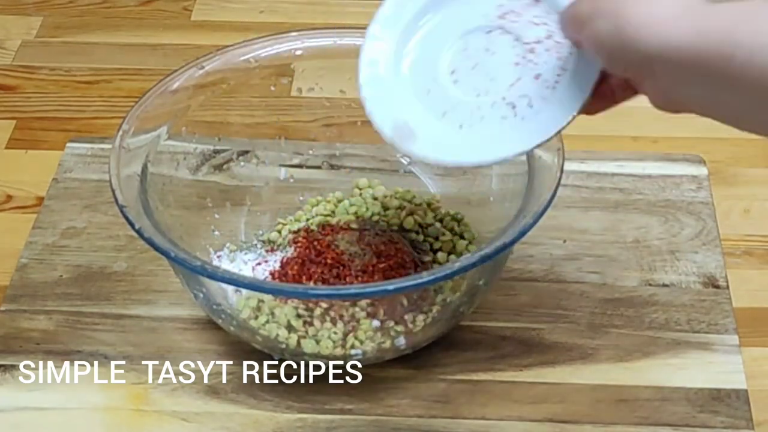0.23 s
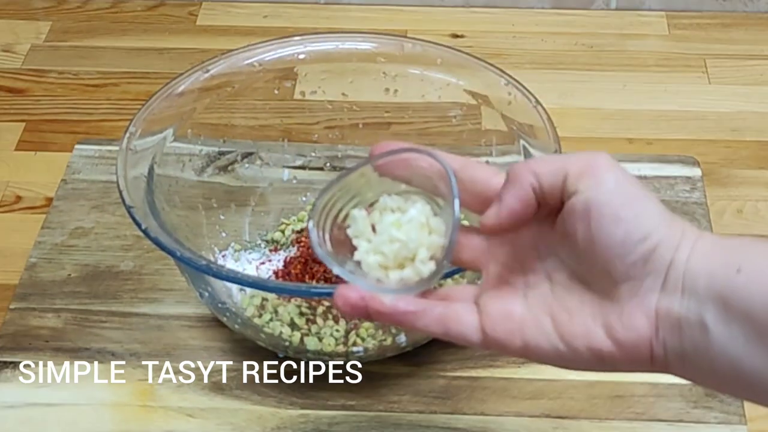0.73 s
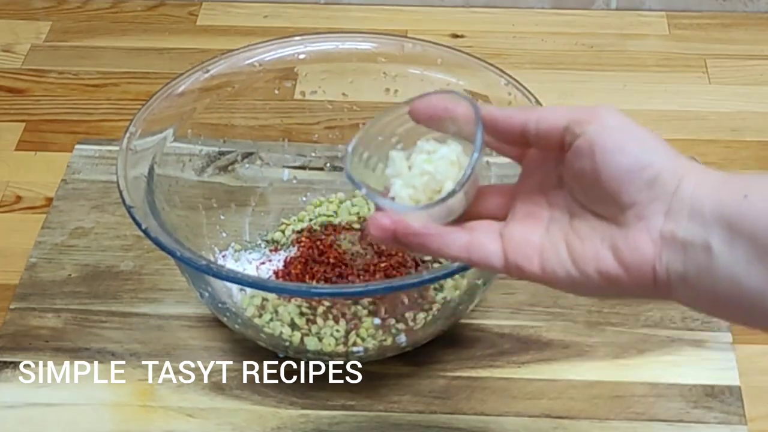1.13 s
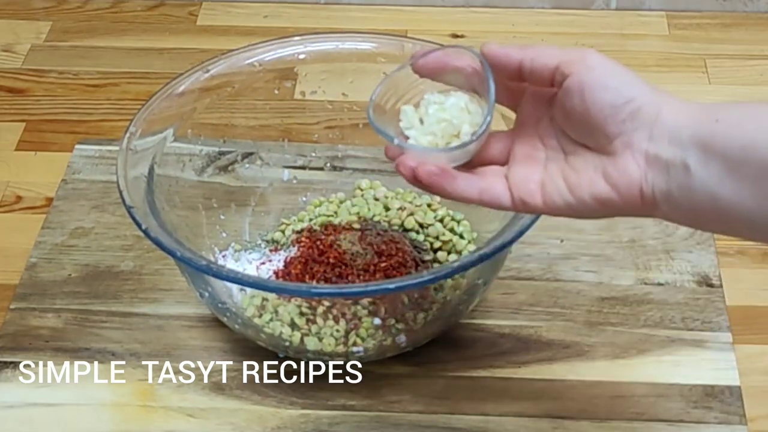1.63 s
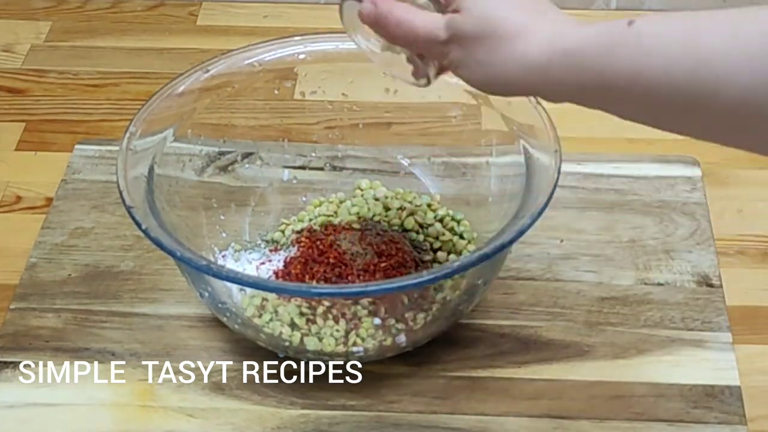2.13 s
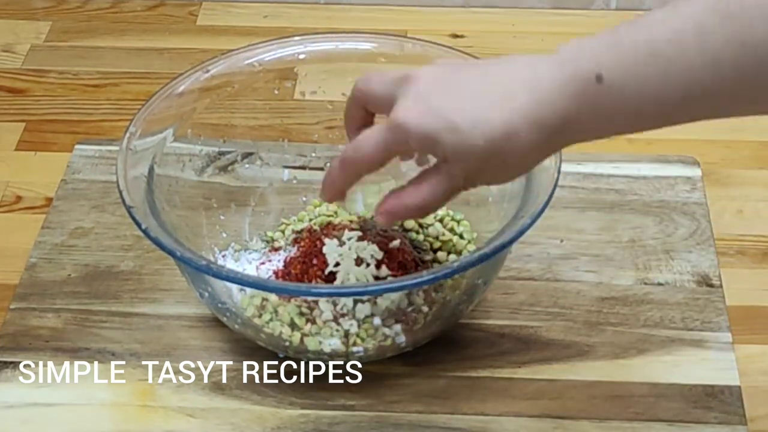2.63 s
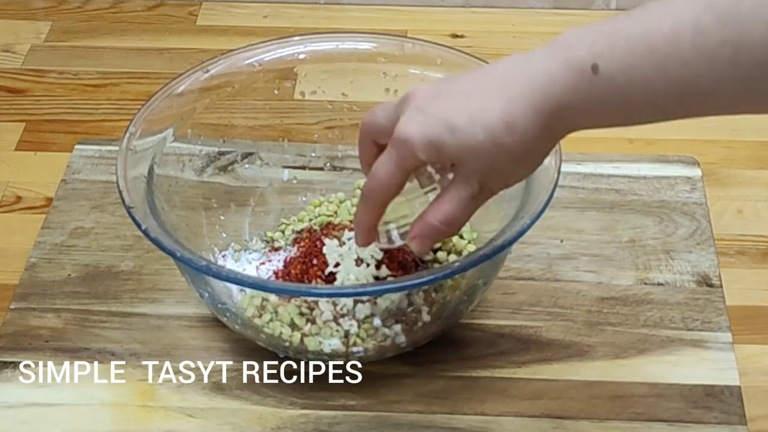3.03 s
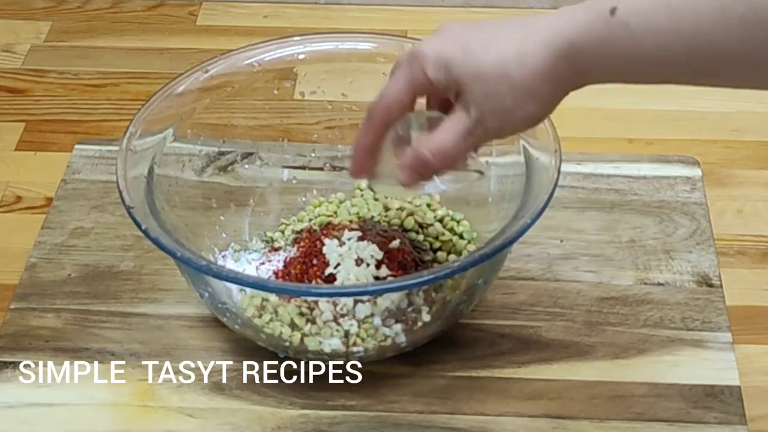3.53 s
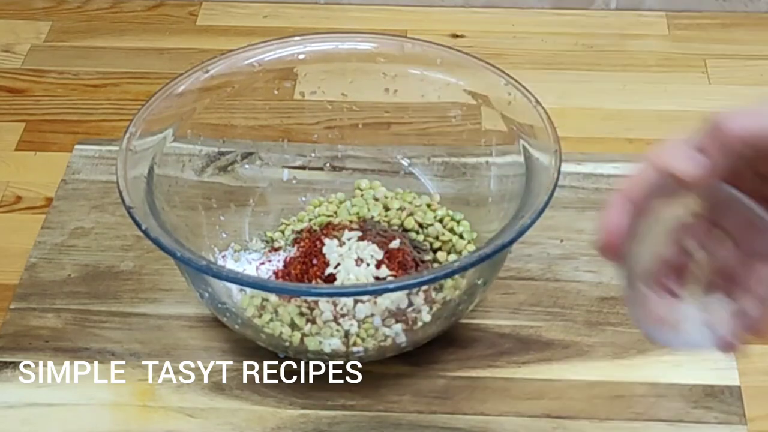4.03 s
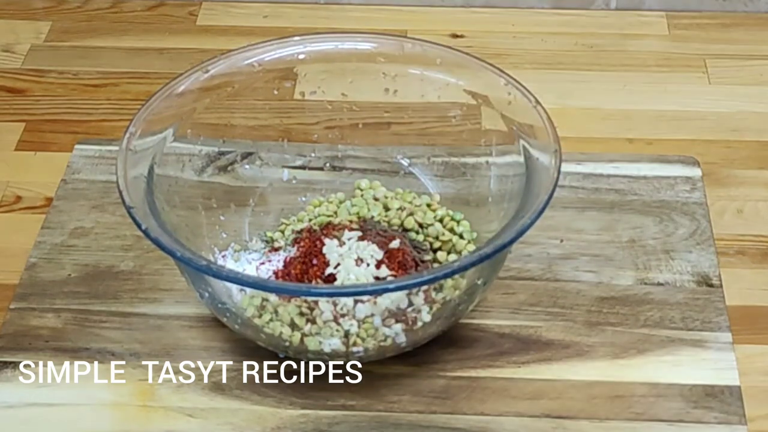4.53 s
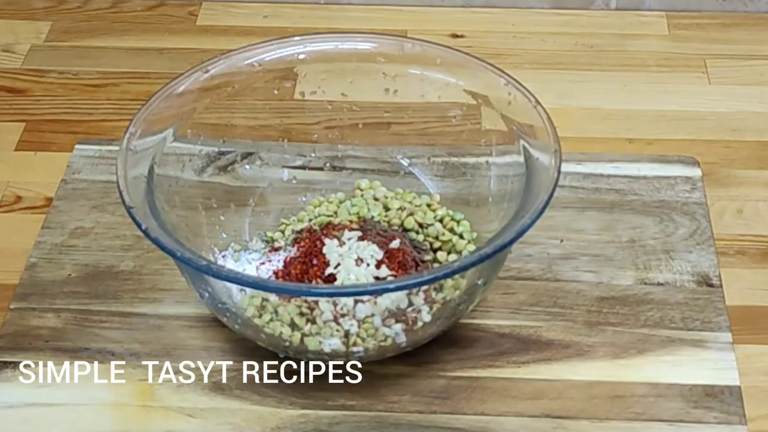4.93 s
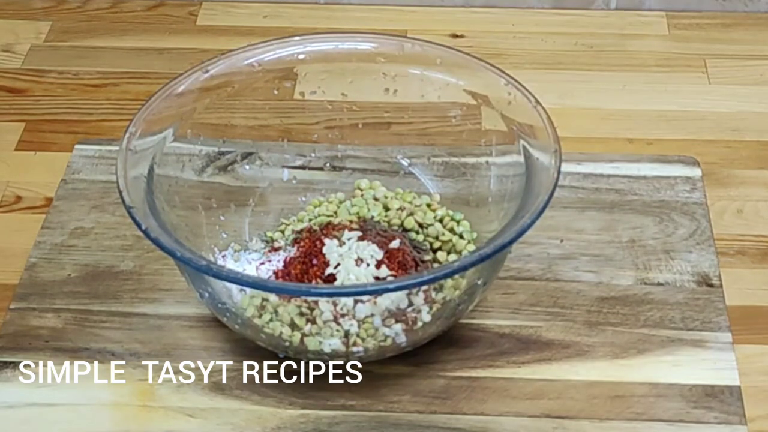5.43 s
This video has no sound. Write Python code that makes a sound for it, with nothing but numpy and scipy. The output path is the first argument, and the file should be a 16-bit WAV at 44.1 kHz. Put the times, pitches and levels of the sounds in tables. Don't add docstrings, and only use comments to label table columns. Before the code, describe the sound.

Small dishes tap a big glass bowl with clear shimmering rings, followed by soft and then hard wooden thumps over faint fridge hum.

```python
import sys
import numpy as np
from scipy import signal
from scipy.fft import rfft, irfft
from scipy.io import wavfile
from scipy.ndimage import uniform_filter1d

SR = 44100
rng = np.random.default_rng(int(sys.argv[2]) if len(sys.argv) > 2 else 0)


def volts_from_db(level):
    exponent = np.asarray(level, float) / 20
    return 10 ** exponent


def inscribe(sig):
    pcm = np.round(np.clip(np.atleast_2d(sig).T, -1, 1) * 32767)
    wavfile.write(sys.argv[1], SR, pcm.astype(np.int16))


N = 250047


def rms_one(x):
    return x / np.sqrt(np.mean(x ** 2) + 1e-20)


def at_hz(points, hz):
    table_hz, value = np.array(points).T[:2]
    return np.interp(np.log(np.maximum(hz, 1)), np.log(table_hz), value)


def filtered(x, order, edge_hz, kind="low"):
    return signal.sosfilt(signal.butter(order, edge_hz, kind, fs=SR, output="sos"), x)


def drift(rate_hz):
    r = np.exp(-80 * np.pi * rate_hz / SR)
    white = rng.standard_normal(N // 40 + 2002)
    slow = signal.lfilter([1], [1, -2 * r, r * r], white)[2000:]
    return np.interp(np.arange(N) / 40, np.arange(len(slow)), rms_one(slow))


# (frequency [Hz], left-right likeness [-1..1])
LIKENESS = [(60, 0.75), (150, 0.94), (380, 0.8), (950, 0.22), (2380, 0.41), (5970, -0.01), (15000, 0.58)]


def stereo_noise(spectrum, size):
    hz = np.fft.rfftfreq(size, 1 / SR)
    alike = np.clip(at_hz(LIKENESS, hz), 0, 1)
    mid, side = rfft(rng.standard_normal((2, size)))
    inside = (hz > spectrum[0][0] / 2) & (hz < spectrum[-1][0] * 2)
    both = np.sqrt(1 + alike) * mid + np.sqrt(1 - alike) * side * [[1], [-1]]
    return rms_one(irfft(both * volts_from_db(at_hz(spectrum, hz)) * inside, size))


def resonate(x, hz, width_hz):
    r = np.exp(-np.pi * width_hz / SR)
    zeros = (1 - r * r) / 2 * np.array([1, 0, -1])
    return signal.lfilter(zeros, [1, -2 * r * np.cos(2 * np.pi * hz / SR), r * r], x)


def ringing(since, hz, t60, lead_turns=0):
    contact_s = .001
    wave = np.sin(2 * np.pi * (hz * since + lead_turns))
    return wave * volts_from_db(-60 * since / t60) * (1 - np.exp(-since / contact_s))


# (frequency [Hz], level [dB])
HISS = [(1760, -25.5), (3000, -3), (3750, 0.5), (6690, -15.5), (11700, -4), (13700, -2), (14600, -10),
        (15000, -22)]
HISS_DB = -81


def hiss():
    return volts_from_db(HISS_DB + 1.2) * stereo_noise(HISS, N)


# (frequency [Hz], density [dB per Hz])
RUMBLE = [(30, -26.5), (60, -22.5), (100, -12.5), (122, -11.5), (138, 2), (160, -9.5), (300, -6.5),
          (420, -10.5), (630, -20.5), (1000, -25.5), (2000, -32), (4000, -49.5)]
RUMBLE_DB = -61


def rumble():
    return volts_from_db(RUMBLE_DB) * stereo_noise(RUMBLE, N)


# (frequency [Hz], level re hum [dB])
HUM_OVERTONES = [(299.6, -19), (495.0, -24.5), (660.0, -30.5), (1344.2, -51.5)]
HUM_HZ, HUM_DB = 199.6, -54.5


def refrigerator_hum():
    t = np.arange(N) / SR
    hum = np.sin(2 * np.pi * HUM_HZ * t + 0.32 * drift(0.83)) * volts_from_db(1.2 * drift(12))
    for hz, level_db in HUM_OVERTONES:
        level = volts_from_db(level_db + 3.0 * drift(14))
        hum = hum + level * np.sin(2 * np.pi * hz * t + 0.27 * drift(2.9))
    return np.sqrt(2) * volts_from_db(HUM_DB + np.c_[[-.8, .8]]) * hum


# (frequency [Hz], level [dB])
RUSTLE = [(400, -12.5), (800, 4.5), (1300, -6.5), (2200, -4.5), (5000, -19)]
# (time [s], level [dB], half length [s])
MOVES = [
    (.6, -76, 0.1),
    (1.15, -76, 0.16),
    (2.6, -86, 0.18),
    (3.3, -72, 0.1),
    (4.2, -79, 0.14),
]
STILL_DB = -86


def rustle():
    t = np.arange(N) / SR
    moving = volts_from_db(STILL_DB) + sum(volts_from_db(db) * np.exp(-((t - s) / half_s) ** 2) for s, db, half_s in MOVES)
    return moving * volts_from_db(1.5 * drift(6.6)) * stereo_noise(RUSTLE, N)


SCENE_CHANGE_S, CHANGE_DIP_S, CHANGE_DIP_DB = .5959, .0066, -14
POWDER_S, POWDER_RISE_S, POWDER_DB, POWDER_HZ = 0.12, .03, -69.5, 9000


def sliding_powder():
    t = np.arange(N) / SR
    grains = resonate(rng.standard_normal((2, N)), POWDER_HZ, 5000)
    flow = np.clip((t - POWDER_S) / POWDER_RISE_S, 0, 1) * (t < SCENE_CHANGE_S)
    return volts_from_db(POWDER_DB) * grains * flow


def background():
    return sliding_powder() + refrigerator_hum() + rumble() + rustle() + hiss()


# (frequency [Hz], t60 [s])
ROOM_T60 = [(100, 0.54), (260, 0.55), (700, 0.42), (1840, 0.35), (4850, 0.3), (12800, 0.08)]
# (delay [s], level over the tail [dB], smear [s])
ECHOES = [(.0095, 6, 0.0056), (.021, 3, 0.0062), (0.034, 10, 0.0017)]


def kitchen():
    t = np.arange(int(.8 * SR)) / SR
    white, tail = stereo_noise([(20, 0), (20000, 0)], len(t)), 0
    edges_hz = 60 * 2 ** np.arange(0, 8.1, .5)
    for low_hz, high_hz in zip(edges_hz, edges_hz[1:]):
        band = filtered(white, 2, [low_hz, high_hz], "band")
        tail = tail + band * volts_from_db(-60 * t / at_hz(ROOM_T60, np.sqrt(low_hz * high_hz)))
    tail = tail * (1 - np.exp(-t / 0.02))
    returns_db = sum(db * np.exp(-((t - delay_s) / smear_s) ** 2) for delay_s, db, smear_s in ECHOES)
    tail = tail * volts_from_db(returns_db)
    return tail / np.sqrt(np.sum(tail ** 2) / 2)


# (time [s], level [dB], centre [Hz], width [Hz])
TICKS = [
    (.6165, -53.5, 3960, 893),
    (0.749, -74, 10100, 5000),
    (.778, -72, 11970, 5000),
    (0.796, -78, 7000, 5970),
    (.888, -83, 8000, 8150),
    (.944, -77, 11100, 5000),
    (2.461, -77, 6020, 7000),
    (3.19, -68, 9900, 7000),
    (1.194, -70, 10400, 7900),
]


def ticks():
    out, t = np.zeros((2, N)), np.arange(400) / SR
    for s, level_db, hz, width_hz in TICKS:
        burst = rng.standard_normal((2, len(t))) * volts_from_db(-60 * t / 0.004)
        click = resonate(resonate(burst, hz, width_hz), hz, width_hz)
        at = round(s * SR)
        out[:, at:at + len(t)] += volts_from_db(level_db + 20.5) * click
    return out


# (frequency [Hz], level [dB], t60 [s])
PANEL = [(132.7, -13, 0.12), (359.4, -6, 0.0976), (625, 6.5, 0.019), (711, -7, 0.06), (930, -14.5, 0.028),
         (1011, 4.5, 0.041), (1350, -10, 0.11), (1960, -29, 0.043)]
# (time [s], level [dB], softness cut-off [Hz], left-right [dB])
BLOWS = [
    (3.21, -46, 256, -2),
    (3.236, -38, 396, -2),
    (3.27, -51.5, 685, 2.5),
    (3.315, -47, 334, 2),
    (3.36, -46.5, 350, 0),
    (3.447, -54.5, 230, -4),
    (5.2848, -20.5, 1285, -1),
    (5.388, -19, 1404, 0.5),
]
# (delay [s], level [dB])
BOUNCES = [
    (0, 0.5),
    (.0055, -4),
    (.034, -4.5),
]
HARD_HZ = 800
THUD_DB, THUD_HZ, THUD_T60_S = 3, 154, .09


def panel_blow(t, soft_hz):
    body = sum(volts_from_db(db + rng.normal(0, 1.5)) * ringing(t, hz, t60) for hz, db, t60 in PANEL)
    body = body + volts_from_db(THUD_DB) * (300 / soft_hz) ** 2 * ringing(t, THUD_HZ, THUD_T60_S)
    rattle = filtered(rng.standard_normal((2, len(t))), 3, 400, "high") * volts_from_db(-60 * t / 0.017)
    body = filtered(body + 7.26 * rattle, 3, soft_hz)
    return body + volts_from_db(-23.5) * (soft_hz / 1300) ** 2 * rattle


def knocks():
    out, t = np.zeros((2, N)), np.arange(int(.25 * SR)) / SR
    for s, level_db, soft_hz, pan_db in BLOWS:
        for delay_s, loss_db in (BOUNCES if soft_hz > HARD_HZ else BOUNCES[:1]):
            blow = volts_from_db(level_db + loss_db + pan_db * np.c_[[.5, -.5]]) * panel_blow(t, soft_hz)
            at = round((s + delay_s) * SR)
            out[:, at:at + len(t)] += blow[:, :N - at]
    return filtered(out, 4, 115, "high")


# (frequency [Hz], twin frequency [Hz])
RIM_HZ = [(511.0, 513.6), (1344.6, 1339.5), (2459.5, 2461.5), (3836.5, 3829.5), (5374.0, 5365.5)]
# (t60 [s], twin t60 [s], twin lead [turns], share sent to the room [dB])
RIM_DECAY = [(0.86, .6, -0.0061, -11), (0.7, .55, 0.2, -18.5), (0.51, 1.1, -.22, -8), (.18, .15, 0, -1.5),
             (.12, 0.1, 0, -2)]
# (lobes [count], level [dB], left-right [dB], twin share left [ratio], right [ratio])
RIM_FACING = [(2, -21, -8.5, 1.4, .5), (3, -5, 8.5, 0.093, 1.1), (4, -7, -2.5, .07, 0.018),
              (5, -9.5, 2, .48, .4), (6, -29, -1.5, .6, .8)]
KNEE_HZ = 2100


def rim_modes(t, force_db, hard_db_per_octave, place_rad):
    out = 0
    swell = 1 - 0.48 * np.exp(-t / 0.029)
    for (hz, twin_hz), decay, facing in zip(RIM_HZ, RIM_DECAY, RIM_FACING):
        t60, twin_t60, turns, room_db = decay
        lobes, db, pan_db, left, right = facing
        share = np.c_[[left, right * np.cos(round(lobes) * place_rad)]]
        pair = ringing(t, hz, t60) + share * ringing(t, twin_hz, twin_t60, turns)
        bright_db = hard_db_per_octave * max(np.log2(hz / KNEE_HZ), 0)
        gain = volts_from_db(db + force_db + bright_db + pan_db * np.c_[[.5, -.5]])
        out = out + gain * np.array([volts_from_db(-1.4) * swell * pair, volts_from_db(room_db) * pair])
    return out


WALL_HZ = [1857, 2589, 3553, 5803, 6137, 6380, 6675, 7060, 7146, 7445, 7862, 8247, 8630, 8870, 9630, 9981,
           10582, 10795, 11495, 12235, 13345, 13710, 14020]
# (t60 [s], level [dB])
WALL = [(0.59, -49.5), (0.099, -34.5), (0.087, -40), (0.43, -54), (0.2, -53), (0.2, -46.5), (0.13, -53),
        (0.15, -53.5), (0.15, -42), (0.12, -51.5), (0.27, -58.5), (0.16, -58.5), (0.084, -47.5),
        (0.35, -47), (0.13, -50.5), (0.19, -55), (0.18, -53), (0.27, -54), (0.23, -54), (0.18, -52),
        (0.18, -54), (0.18, -54.5), (0.17, -62.5)]
WALL_SCATTER_DB = 5.5


def wall_modes(t, wall_db):
    wall = 0
    for k, (hz, (t60, db)) in enumerate(zip(WALL_HZ, WALL)):
        t60 = min(t60, .27)
        share, sign = rng.uniform(-2.2, 1.0, (2, 1)), np.c_[[1, (-1) ** (k // 2)]]
        gain = volts_from_db(wall_db + db + WALL_SCATTER_DB * rng.standard_normal())
        wall = wall + gain * (sign * ringing(t, hz, t60) + share * ringing(t, hz * 1.002, t60))
    return wall


def contact_crack(t, crack_db, low_hz, high_hz, edge_db):
    burst = rng.standard_normal((2, len(t))) * np.minimum(t / .0006, 1) * volts_from_db(-60 * t / .018)
    crack = filtered(filtered(burst, 8, high_hz), 2, low_hz, "high")
    return volts_from_db(crack_db) * (crack + volts_from_db(edge_db) * np.diff(burst, prepend=0))


# (time [s], strength [dB], hardness [dB per octave], place on the rim [rad])
TAPS = [
    (-0.1, -10, 8, 0.069),
    (.0618, 0.8, -1.45, 0.044),
    (2.8792, -11.5, 18, 1.04),
]
# (wall modes [dB], crack [dB], crack bottom [Hz], crack top [Hz], bright edge [dB])
CONTACT = [
    (-6.5, -6, 430, 3600, -44),
    (7.5, 0, 280, 3600, -39),
    (11, -1, 270, 3700, -28),
]
PUSH_DB, PUSH_HZ = -37.5, 45
BOARD_DIP_HZ, BOARD_DIP_WIDTH_HZ = 4700, 900


def tap(index, lead):
    s, force_db, hard_db_per_octave, place_rad = TAPS[index]
    wall_db, crack_db, low_hz, high_hz, edge_db = CONTACT[index]
    t, out = np.arange(int(1.2 * SR)) / SR, np.zeros((2, 2, N + lead))
    wall = wall_modes(t, wall_db)
    crack = contact_crack(t, crack_db, low_hz, high_hz, edge_db)
    push = volts_from_db(PUSH_DB + crack_db) * ringing(t, PUSH_HZ, .08) * np.c_[[.6, 1]]
    direct = volts_from_db(2.5) * wall + volts_from_db(-0.5) * crack + push
    send = volts_from_db(-3.5) * wall + crack
    first = round(s * SR) + lead
    rim = rim_modes(t, force_db, hard_db_per_octave, place_rad)
    out[:, :, first:first + len(t)] = rim + np.array([direct, send])
    notch = signal.iirnotch(BOARD_DIP_HZ, BOARD_DIP_HZ / BOARD_DIP_WIDTH_HZ, SR)
    return signal.lfilter(*notch, out + 1e-18)


REBOUND_S, REBOUND_DB = .0335, -3


def scene():
    lead, room, t = SR // 5, kitchen(), np.arange(N) / SR

    def in_room(taps):
        near, send = taps
        return (near + signal.fftconvolve(send, room, axes=1)[:, :N + lead])[:, lead:]

    before = in_room(tap(index=0, lead=lead) + tap(index=1, lead=lead))
    after = tap(index=2, lead=lead)
    after = in_room(after + volts_from_db(REBOUND_DB) * np.roll(after, round(REBOUND_S * SR), axis=2))
    far = knocks()
    far = volts_from_db(-1.5) * far + volts_from_db(1.8) * signal.fftconvolve(far, room, axes=1)[:, :N]
    dip = (t > SCENE_CHANGE_S) & (t < SCENE_CHANGE_S + CHANGE_DIP_S)
    bed = background() * volts_from_db(CHANGE_DIP_DB * dip)
    return before * (t < SCENE_CHANGE_S) + after + far + ticks() + bed


def top_cut(x):
    return signal.sosfilt(signal.butter(12, 15590, fs=SR, output="sos"), x)


def record(dry):
    t = np.arange(N) / SR
    level_db = 10 * np.log10(uniform_filter1d(np.mean(dry ** 2, axis=0), 64) + 1e-12)
    cut_db = .21 * np.maximum(level_db + 48, 0)
    cut_db = np.maximum.accumulate(cut_db + 24.996 * t) - 25.15 * t
    r = np.exp(-1 / (0.018 * SR))
    cut_db = signal.lfilter([1 - r], [1, -r], cut_db, zi=[r * cut_db[0]])[0]
    band = filtered(dry * volts_from_db(-cut_db), 2, 50, "high")
    mix = signal.sosfilt(signal.cheby2(8, 40, 15600, fs=SR, output="sos"), band)
    return top_cut(mix)


dry = scene()
out = record(dry)
inscribe(out)
```